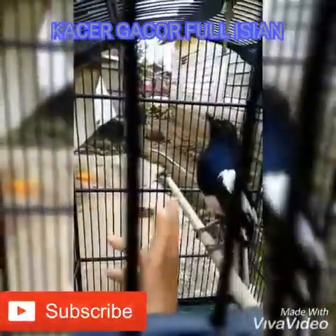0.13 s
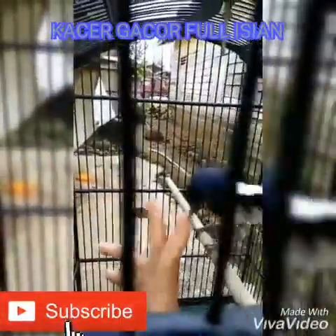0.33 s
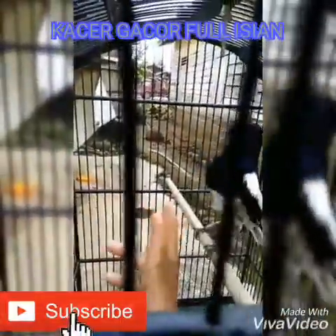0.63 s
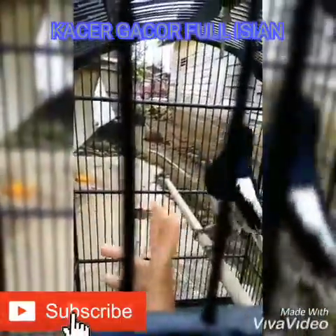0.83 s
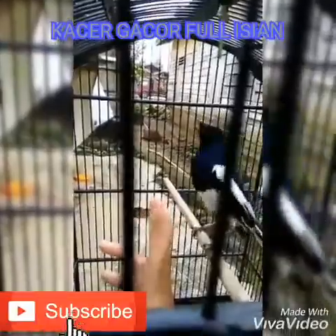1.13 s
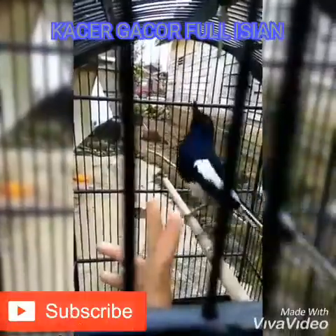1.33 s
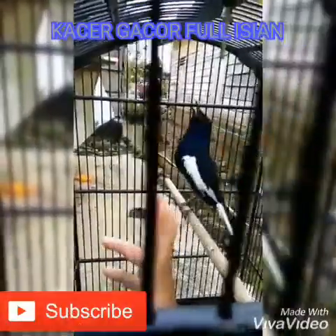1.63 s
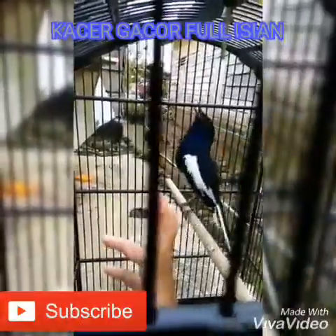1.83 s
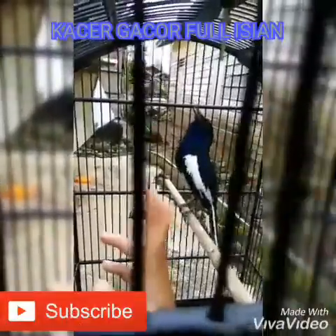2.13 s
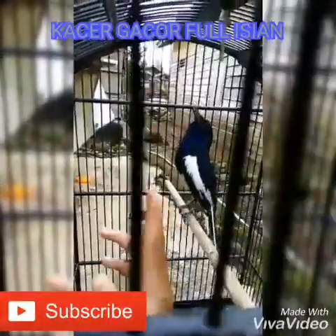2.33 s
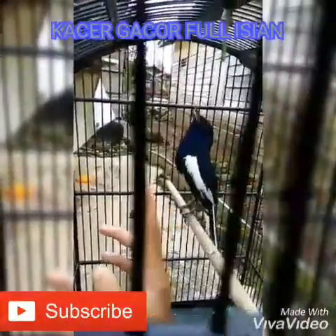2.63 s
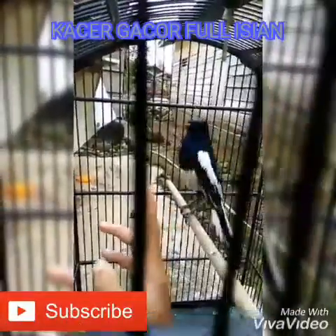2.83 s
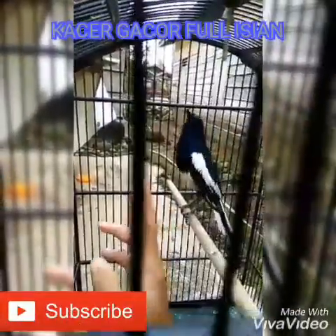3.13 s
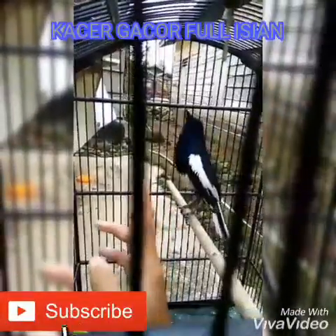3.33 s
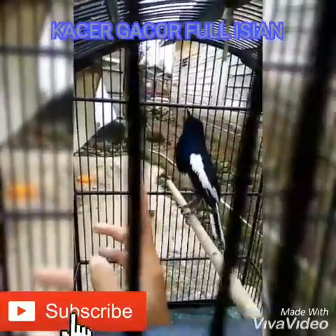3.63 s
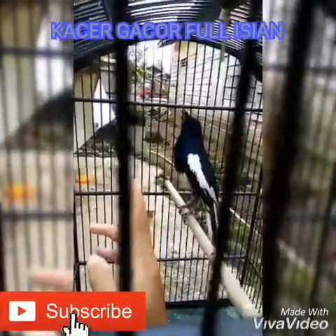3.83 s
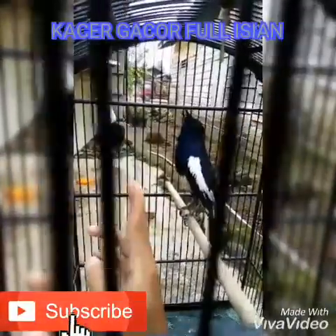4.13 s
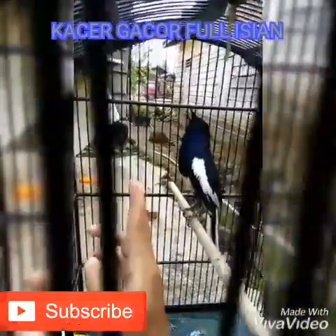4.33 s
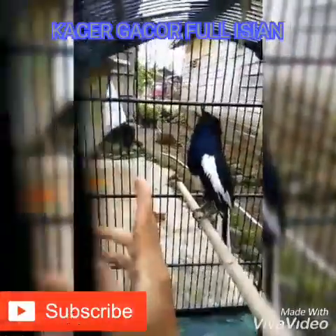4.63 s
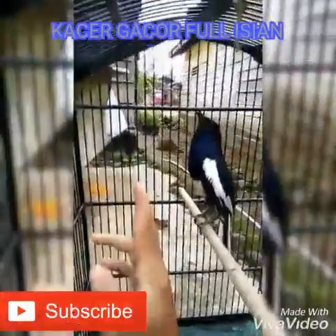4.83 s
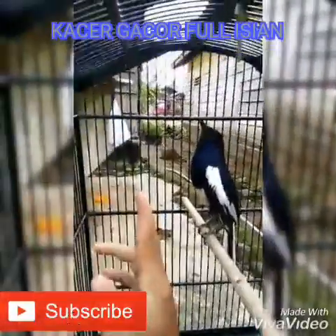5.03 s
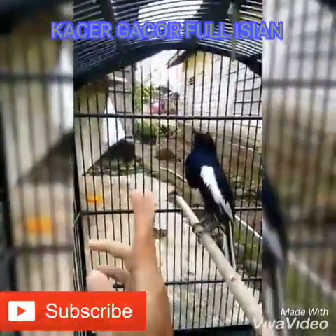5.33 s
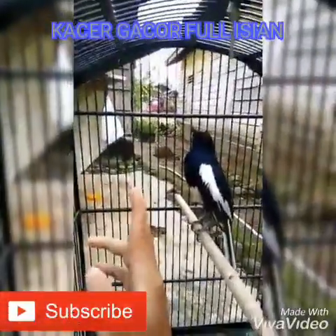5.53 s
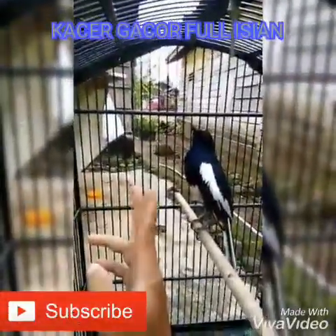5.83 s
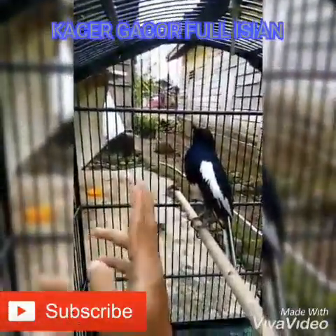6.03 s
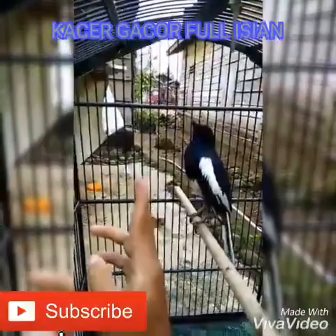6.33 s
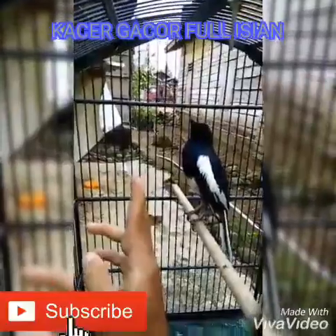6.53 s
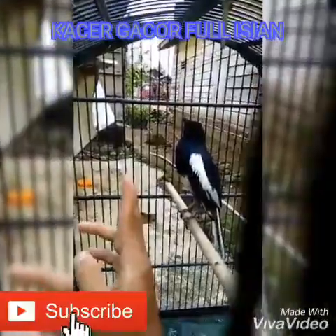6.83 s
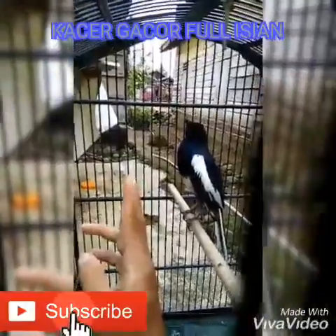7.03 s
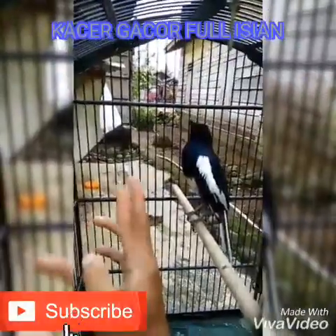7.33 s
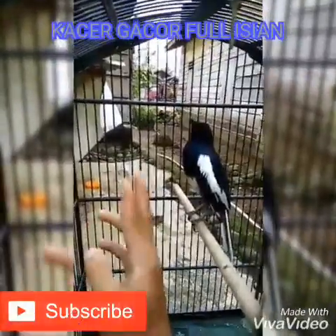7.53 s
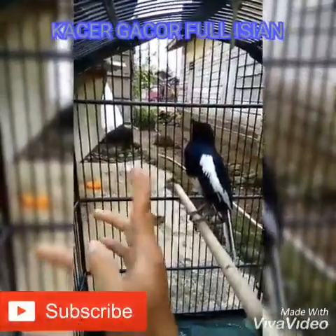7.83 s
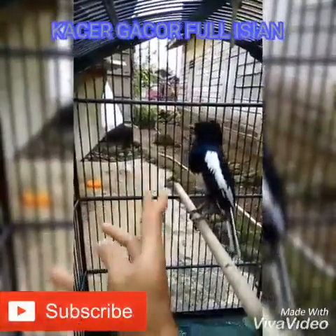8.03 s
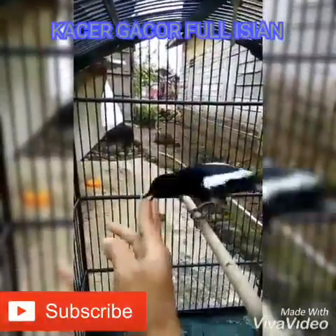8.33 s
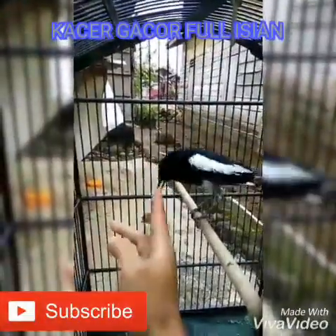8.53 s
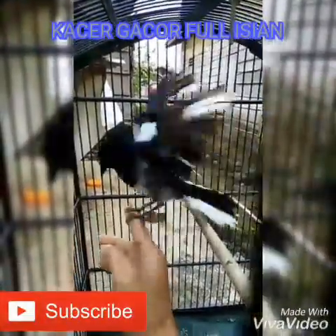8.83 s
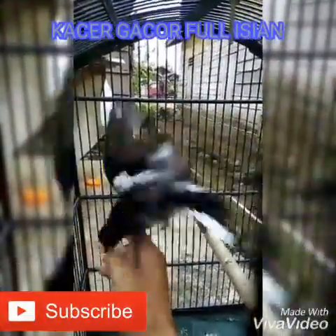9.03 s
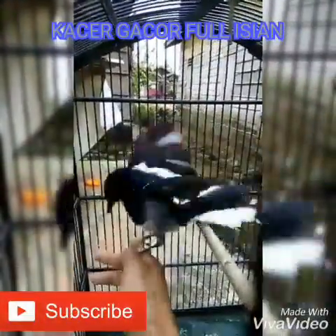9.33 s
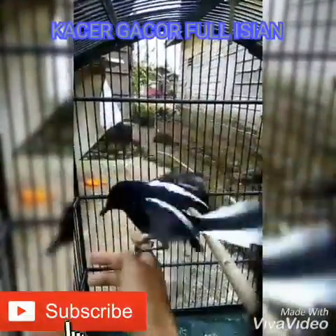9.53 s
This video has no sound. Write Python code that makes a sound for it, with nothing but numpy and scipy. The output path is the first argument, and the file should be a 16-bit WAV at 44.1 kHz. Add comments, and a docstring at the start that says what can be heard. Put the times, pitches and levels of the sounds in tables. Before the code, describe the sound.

A caged songbird bursts into loud gliding whistles and harsh rattling screeches close by, pauses over faint rumble, then sings again more softly.

```python
"""A faint far call over low hum, rumble and hiss comes first; half a second later a caged magpie-robin sings close by.
Its loud gliding whistles, trills and harsh screeches are sine waves with overtones and bands of noise.
Nearby walls add echoes; after a pause the bird starts again more softly, and its cage ticks once.
Behind it, shaped noise and slow waves make a hiss that swells late, a drone, faint noise bands and soft bumps."""
import sys
import numpy as np
from scipy import signal
from scipy.fft import rfft, irfft, next_fast_len
from scipy.io import wavfile
from scipy.ndimage import uniform_filter1d

SR = 44100
rng = np.random.default_rng(int(sys.argv[2]) if len(sys.argv) > 2 else 0)


def int16_out(signal):
    """Quantize to a 16-bit WAV file."""
    q = np.round(np.clip(np.atleast_2d(signal).T, -1, 1) * 32767)
    wavfile.write(sys.argv[1], SR, q.astype(np.int16))


N = 426447
TIME = np.arange(N) / SR
CUTOFF_HZ = 15700  # little sound remains above this


# Notes that slide one way. Columns: start_s, end_s, from_hz, to_hz, bend (no unit), then the delivery.
# bend > 0 settles on the last pitch; bend < 0 lingers near the first pitch, then flicks away.
# Delivery columns, the same in all three note tables: attack_s, release_s, whistle_db, swell_db (end against
# start), overtones_db, rasp_db, harshening_db (end against start), left_minus_right_db, left_lead_radians.
GLIDES = [(0.528, 0.562, 3700, 5750, 4.5, 0.026, .004, -18.5, 7, -39.5, -20.5, 17, -10, 1.5),
          (0.557, 0.604, 5550, 6120, -1.5, 0.0027, 0.0061, -21.5, 3, -45, -23.5, 0, -3.5, 1.55),
          (0.716, 0.792, 5730, 4390, 1.16, 0.0081, 0.0048, -20.5, -5.5, -24.5, -45, 28, -6.5, 0.8),
          (0.796, 0.917, 4445, 3265, 0.25, 0.0076, 0.0072, -15, 4, -26, -46.5, -20.5, -6, 0),
          (0.909, 1.1, 3348, 2928, 3.5, 0.0056, 0.0053, -14, -5.5, -38, -62.5, -20, -8, -1),
          (1.164, 1.221, 5405, 4726, -0.3, 0.0075, 0.0035, -8.5, 2.5, -23, -31.5, 19.5, -11.5, 2.5),
          (1.215, 1.254, 4770, 2476, 0.45, 0.0028, 0.008, -9.5, -5.5, -29, -19.5, -6, -1.5, 1.5),
          (1.329, 1.491, 5130, 5934, 1.33, 0.02, 0.019, -8.5, 7, -32.5, -31.5, 33, -3.5, 1.52),
          (1.63, 1.725, 3274, 3892, 8, 0.038, 0.0048, -6, -8, -22.5, -31, 7.5, -7.5, 4),
          (1.745, 1.791, 3835, 3270, -0.5, 0.0049, 0.0022, -12.5, -17.5, -26.5, -14, 12, -13.5, 4),
          (1.903, 1.992, 4280, 3173, 7, 0.0052, 0.0049, -11.5, -9.5, -31.5, -37, 11.5, -5.5, 4.5),
          (2.066, 2.184, 4480, 2627, 8, 0.0041, 0.013, -10, 14.5, -32, -44, 0.5, -11.5, 0.36),
          (2.219, 2.261, 1402, 2096, -3, 0.011, 0.0023, -20.5, 12.5, -48, -38.5, 8.5, 1, 3),
          (2.254, 2.336, 2028, 2473, 9, 0.006, 0.019, -7.5, -2.5, -26.5, -41.5, 3.5, -2, -1.5),
          (3.273, 3.35, 2010, 1426, 1, 0.0026, 0.006, -30.5, -1, -50, -44.5, 1.5, -0.5, -2.5),
          (4.094, 4.156, 5033, 2000, -4.5, 0.013, 0.045, -26.5, -34, -24.5, -20.5, 16.5, -4.5, -1.5),
          (4.758, 4.811, 3085, 3442, 5, 0.004, 0.0053, -9.5, 0, -18.5, -28, 7.5, -6.5, -2.5),
          (4.806, 4.86, 3364, 3670, 1.5, 0.0033, 0.0087, -7, -5.5, -18.5, -15.5, 1.5, -2.5, -4),
          (4.837, 4.886, 3006, 2790, -0.5, .008, .004, -9.5, 3.5, -20, -18, -8.5, 0, -3.5),
          (4.878, 4.985, 2832, 1911, 2.5, 0.0023, 0.0074, -8, -7.5, -22, -32.5, -6.5, -2.5, 2.0),
          (8.259, 8.29, 5550, 5320, 2.5, 0.0091, 0.0032, -24, 9, -14, -29.5, 22, -2.5, 1.5),
          (8.286, 8.32, 5500, 6010, 3.5, 0.0037, 0.0095, -19, -4, -20.5, -16, 7, -3, -0.3),
          (8.423, 8.799, 5880, 3077, 2.5, 0.037, 0.00244, -39, -19.5, -39, -46.5, 1, -3.5, -1.5),
          (8.883, 8.983, 5340, 2500, -3, 0.0042, 0.0027, -32.5, -3, -37.5, -44.5, 32.5, 2, -1.5),
          (9.05, 9.222, 5130, 6070, -0.5, 0.0058, 0.008, -33, 13.5, -39, -50, -1, -2.5, -2),
          (9.32, 9.426, 3770, 3950, 0.5, 0.0066, 0.0075, -47, 5, -32.5, -52.5, -4.5, -4, 1),
          (9.434, 9.471, 4220, 5420, 1, .01, 0.0034, -32, 25.5, -40, -37.5, 17, 1, 3.5),
          (9.604, 9.673, 4320, 3140, 1.6, 0.01, 0.0034, -24, -2.5, -23, -27.5, -5.5, -7, 5.5)]
# Notes that rise and fall.
# Columns: start_s, length_s, from_hz, top_hz, to_hz, rise_s, bend of the fall (no unit), then the delivery.
ARCHES = [(2.354, 0.28, 2150, 2225, 1419, 0.0042, 19.8, 0.0018, 0.0097, -26.5, -4.5, -46, -50, -9, -1.5, 4),
          (2.772, 0.22, 2598, 2710, 2054, 0.1, 2.33, 0.054, 0.031, -10.5, -2.5, -39, -23.5, 6, -1, -1.33),
          (3.092, 0.1, 1791, 2264, 1760, 0.054, 0.6, 0.03, 0.019, -16.5, -3, -33, -25.5, -1.5, -1, 1.9),
          (3.392, 0.12, 1910, 2453, 2006, 0.087, 0.58, 0.015, 0.012, -9, 4, -28.5, -32.5, 11, -2, 0.57),
          (4.155, 0.18, 3207, 3756, 2701, 0.037, 3.4, 0.0044, 0.0028, -9, -8, -21, -33.5, -20, -6.0, 4),
          (4.41, 0.22, 2583, 3111, 2070, 0.069, 4.73, 0.0063, 0.0031, -9, 0, -28.5, -40, 13.5, -2, 2.0)]
# Harsh, rattling notes around one pitch. Columns: start_s, length_s, pitch_hz, then the delivery.
SCREECHES = [(1.760, 0.09, 5900, 0.019, 0.016, -15, -15, -22.5, -8.5, -3, -17.5, 0.66),
             (3.606, 0.0073, 4300, .002, 0.0028, -23.5, 0.5, -32.5, -12, -1.5, -5, 2),
             (3.615, 0.14, 4212, 0.003, 0.028, -17.5, 3, -35.5, -7, -6, -8, 4.5),
             (3.758, 0.041, 4440, .002, 0.0033, -16.5, -30, -25.5, -10.5, -17.5, 4, 2.3),
             (3.799, 0.028, 4400, 0.0066, 0.0062, -16.5, -9, -27.5, -6.5, -5, 2, 1.07),
             (3.831, 0.016, 4394, 0.0016, 0.0068, -25.5, -3, -24.5, -5, -2.5, -15, 1.04),
             (9.463, 0.075, 6300, 0.007, 0.012, -20, -14, -33, -25.5, -16, 0, 1.23)]


def bird():
    """Glides, arches and screeches, with broad air noise under the raspy ones and hoarse extra tones."""
    glides = [(start, end - start, *rest) for start, end, *rest in GLIDES]
    voices, breaths = zip(
        sing(glides, glide, breath_db=-8.5, rasp_width_hz=480, half_db=-7.5),
        sing(ARCHES, arch, breath_db=-15.5, rasp_width_hz=280, half_db=-9.0),
        sing(SCREECHES, screech, breath_db=-12.0, rasp_width_hz=360, half_db=-9.5, rattles=True))
    air_noise = sum(breaths) * diffuse_noise(RASP_HIGH_NOTES)
    return sum(voices) + air_noise + extra_tones()


# Moments where the whistle briefly swells or dips. Columns: time_s, half_width_s, change_db.
ACCENTS = [(0.758, 0.019, -16.5), (2.145, 0.019, 3), (2.365, 0.013, 15), (4.336, 0.008, 13),
           (4.564, 0.023, 6), (4.912, 0.023, 2.5), (8.536, 0.022, 22.5), (8.757, 0.058, 25),
           (9.077, 0.0188, 16.5)]


def sing(notes, contour, breath_db, rasp_width_hz, half_db, rattles=False):
    """Sing notes of one kind, and give the strength of the air noise under them."""
    voice, breath = np.zeros((2, N)), np.zeros(N)
    for start, length, *shape, attack_s, release_s, whistle_db, swell_db, overtone_db, rasp_db, \
            harshen_db, pan_db, lead in notes:
        span, age, gate = during(start, length, attack_s, release_s)
        t = TIME[span]
        whistle_db, overtone_db, rasp_db = loudness(
            age / length, whistle_db, swell_db, overtone_db, rasp_db, harshen_db)
        for accent_s, width_s, change_db in ACCENTS:
            distance = (t - accent_s) / width_s
            whistle_db = whistle_db + change_db * np.exp(-np.minimum(distance ** 2, 20))
        pitch = contour(age, length, *shape)
        sound, air = syrinx(t, pitch, whistle_db, overtone_db, rasp_db, pan_db, lead, rasp_width_hz, half_db)
        if rattles:
            gate = gate * rattle(age)
        voice[:, span] += gate * sound
        breath[span] += gate * air
    return voice, from_db(breath_db) * breath


# How much stronger the left side gets the overtones and rasp. Columns: frequency_hz, left_minus_right_db.
TREBLE_PAN = [(4400, -2), (8100, 0), (13000, 2.5)]


def syrinx(t, pitch, whistle_db, overtone_db, rasp_db, pan_db, lead, rasp_width_hz, half_db,
           jitter_hz=220, jitter_rate_hz=700, shimmer=0.27, blur=2.3, blur_hz=55, grain_db=3.5, grain_hz=55):
    """One note from the voice organ: whistle, overtones and rasp; then the strength of its breath noise."""
    pitch = trilled(t, pitch)
    # driven hard, the membranes flap irregularly: pitch and strength waver more as rasp nears the whistle
    chaos = np.minimum(from_db(rasp_db - whistle_db), 1)
    wavering_hz = pitch + jitter_hz * chaos * flutter(jitter_rate_hz, len(t))
    phase = 2 * np.pi * np.cumsum(wavering_hz) / SR
    strength = 1 + shimmer * chaos * flutter(230, len(t))
    strength = strength / np.sqrt(1 + (shimmer * chaos) ** 2)  # keeps the average power

    whistle = np.array([from_db(pan_db) * np.sin(phase + lead), np.sin(phase)])
    whistle *= 2 * from_db(whistle_db) / np.sqrt(1 + from_db(pan_db) ** 2)

    # the stronger and higher the overtones, the more they blur
    blur = blur * from_db(overtone_db - whistle_db) ** 0.36
    whole = np.arange(2, 9)[:, None]
    overtone_level_db = partial_colour(OVERTONES_LOW_NOTES, OVERTONES_HIGH_NOTES, whole, pitch)
    overtone_weights = shares(overtone_level_db, whole * pitch)

    # the rasp also fills the half orders, as the vibration doubles its period
    width_hz = rasp_width_hz * (.5 + chaos.mean())
    halves = np.arange(1, 17)[:, None] / 2
    grain = grain_db * chaos * np.array([flutter(grain_hz, len(t)) for partial in halves])
    rasp_level_db = partial_colour(RASP_LOW_NOTES, RASP_HIGH_NOTES, halves, pitch)
    rasp_level_db = rasp_level_db + grain + half_db * (halves % 1 > 0)
    rasp_weights = shares(rasp_level_db, halves * pitch)

    ears = []
    for shift, side in ((lead, .5), (0, -.5)):  # left, right
        overtones, rasp = 0, 0
        for k, weight in zip(whole, overtone_weights):
            aim = from_db(side * at_hz(TREBLE_PAN, k * pitch.mean()))
            clear = np.sqrt(2) * np.sin(k * (phase + shift))
            blurred = blur * narrow_noise(k * phase, k * blur_hz)
            overtones = overtones + aim * weight * (clear + blurred)
        for k, weight in zip(halves, rasp_weights):
            aim = from_db(side * at_hz(TREBLE_PAN, k * pitch.mean()))
            rasp = rasp + aim * weight * narrow_noise(k * phase, width_hz)
        ears.append(from_db(overtone_db) * overtones / np.hypot(1, blur) + from_db(rasp_db) * rasp)
    return strength * (whistle + ears), strength * from_db(rasp_db) * np.sqrt(chaos)


# Trills and buzzes inside the notes. Columns: start_s, end_s, swings_per_s, swing_hz (each way).
TRILLS = [(0.546, 0.605, 26, 200), (3.617, 3.746, 59.5, 423), (9.465, 9.537, 135, 744),
          (1.699, 1.72, 41, 297), (4.205, 4.239, 81, 320), (1.399, 1.497, 44, 400),
          (1.93, 1.988, 42.5, 217.2), (2.333, 2.626, 118, 200), (2.78, 2.877, 108, 70),
          (3.094, 3.19, 200, 127), (4.16, 4.23, 32.8, 133.8), (9.147, 9.216, 55, 478.5)]
# no note is quite steady, no trill quite even (shares of pitch and of trill rate)
WAVER_SHARE, WAVER_PER_S, TRILL_UNEVENNESS = .005, 70, .17


def trilled(t, pitch):
    """The pitch with its slight unsteadiness and its uneven trills."""
    pitch = pitch * (1 + WAVER_SHARE * flutter(WAVER_PER_S, len(t)))
    for start, end, per_s, swing_hz in TRILLS:
        inside = (t > start) & (t < end)
        if inside.any():
            uneven_rate = per_s * (1 + TRILL_UNEVENNESS * flutter(per_s, len(t)))
            cycles = np.cumsum(inside * uneven_rate) / SR
            pitch = pitch + swing_hz * inside * np.sin(2 * np.pi * cycles)
    return pitch


# Colour of the rasp in high notes and in low notes. Columns: frequency_hz, relative level_db (per Hz).
RASP_HIGH_NOTES = [(1200, -15), (2200, -9.5), (4300, 2.5), (6000, 5.5), (7800, 0), (8800, -7.5),
                   (9800, 6.5), (11000, 5), (12200, -4.5), (13300, -13.5), (15500, -17)]
RASP_LOW_NOTES = [(1200, -8), (2400, 0), (3600, 10.5), (5000, -2), (7000, -3), (9000, -11), (12500, 1),
                  (15000, -0.5)]
# Colour of the overtones in high notes and in low notes. Columns: frequency_hz, relative level_db.
OVERTONES_HIGH_NOTES = [(5900, 2), (7000, -2.5), (8800, -4.5), (10800, 5.5), (12500, -15.5), (15500, -14.5)]
OVERTONES_LOW_NOTES = [(3000, -1), (4700, -12), (6500, -2.5), (8800, -10.5), (12000, -2), (14500, 3)]
# the low colour starts to fade into the high one at this mean pitch, and is gone this much higher
COLOUR_TURNS_HZ, COLOUR_TURN_SPAN_HZ = 2767, 260


def partial_colour(low_notes, high_notes, orders, pitch):
    """Level of each partial in dB: one colour fades into the other as the note's mean pitch rises."""
    high_share = np.clip((pitch.mean() - COLOUR_TURNS_HZ) / COLOUR_TURN_SPAN_HZ, 0, 1)
    hz = orders * pitch
    colour_db = (1 - high_share) * at_hz(low_notes, hz) + high_share * at_hz(high_notes, hz)
    return colour_db + partial_drift(len(orders), len(pitch))


# how far and how fast the balance of the partials drifts
PARTIAL_DRIFT_DB, PARTIAL_DRIFT_PER_S = 4.5, 16


def partial_drift(count, size):
    """Each partial swells and fades at random (dB)."""
    return PARTIAL_DRIFT_DB * np.array([flutter(PARTIAL_DRIFT_PER_S, size) for partial in range(count)])


def shares(level_db, hz):
    """Weights of the audible partials, with a total power of one."""
    weight = from_db(level_db) / (1 + (hz / CUTOFF_HZ) ** 20)
    return weight / np.sqrt(np.sum(weight ** 2, axis=0))


def bent(start, end, bend, u):
    """Exponential slide from start to end as u goes from 0 to 1."""
    return start + (end - start) * np.expm1(-bend * u) / np.expm1(-bend)


def glide(age, length, from_hz, to_hz, bend):
    """Pitch of a note that slides one way."""
    return bent(from_hz, to_hz, bend, age / length)


def arch(age, length, from_hz, top_hz, to_hz, rise_s, bend):
    """Pitch of a note that eases up to its top, rolls over and falls."""
    rising = top_hz + (from_hz - top_hz) * (1 - age / rise_s) ** 2
    falling = bent(top_hz, to_hz, bend, ((age - rise_s) / (length - rise_s)) ** 2)
    return np.where(age < rise_s, rising, falling)


SCREECH_SAG_HZ_PER_S = 3300


def screech(age, length, hz):
    """Pitch of a screech: it sags steadily through the given pitch at mid-note."""
    return hz - SCREECH_SAG_HZ_PER_S * (age - length / 2)


# average rate of the rattle, and its swing up and down
RATTLE_PER_S, RATTLE_DB = 115, 2.4


def rattle(age, unevenness=0.56):
    """Gain of the uneven pulses that roughen a screech."""
    cycles = np.cumsum(RATTLE_PER_S * (1 + unevenness * flutter(60, len(age)))) / SR
    return from_db(RATTLE_DB * np.sin(2 * np.pi * cycles))


# breath pressure peaks at mid-note: how far each part has dropped at the note's ends
WHISTLE_BELLY_DB, HARSH_BELLY_DB = 2.5, 3.5


def loudness(u, whistle_db, swell_db, overtone_db, rasp_db, harshen_db):
    """Levels of whistle, overtones and rasp as u goes from 0 to 1: a steady tilt plus a bulge mid-note."""
    tilt, ends = u - .5, (2 * u - 1) ** 2
    whistle_db = whistle_db + swell_db * tilt - WHISTLE_BELLY_DB * ends
    harsh_db = harshen_db * tilt - HARSH_BELLY_DB * ends
    return whistle_db, overtone_db + harsh_db, rasp_db + harsh_db


# Hoarse extra tones above or below the notes. Columns: start_s, length_s, from_hz, to_hz, level_db.
EXTRA_TONES = [(0.52, 0.04, 4650, 4030, -20.5), (1.786, 0.044, 3350, 3100, -23.5),
               (3.612, 0.12, 2250, 2170, -24), (3.62, 0.092, 2020, 2290, -24.5),
               (4.112, 0.044, 3040, 2030, -23), (3.03, 0.067, 1520, 1340, -29),
               (3, 0.079, 1450, 1020, -35.5), (3.275, 0.066, 1040, 880, -38),
               (1.5, .035, 4950, 4850, -30.5), (4.28, .06, 6200, 6500, -18),
               (4.8, 0.082, 6050, 5550, -22.5), (4.81, 0.16, 4650, 4150, -34.5),
               (4.74, 0.047, 2500, 2140, -24.5), (9.471, 0.06, 3350, 3350, -33)]


def extra_tones(half_width_hz=150):
    """Hoarse extra tones, above or below the notes, made of narrow noise."""
    out = np.zeros((2, N))
    for start, length, from_hz, to_hz, level_db in EXTRA_TONES:
        span, age, gate = during(start, length)
        phase = 2 * np.pi * np.cumsum(from_hz + (to_hz - from_hz) * age / length) / SR
        out[:, span] += from_db(level_db) * gate * [narrow_noise(phase, half_width_hz) for ear in range(2)]
    return out


# Bright colour of the cage's tick. Columns: frequency_hz, relative level_db (per Hz).
TICK_COLOUR = [(300, -42), (1300, -2.0), (5000, 2.0), (15000, 8)]


def cage_tick(at_s=9.243, level_db=-22.5, t60=0.076):
    """Claws hit the cage as the bird hops: bright noise that dies by 60 dB in t60 seconds."""
    age = TIME - at_s
    fade = (age > 0) * from_db(level_db - 60 * np.abs(age) / t60)
    return fade * diffuse_noise(TICK_COLOUR)


# Early echoes from cage floor and wall. Columns: delay_s, left_db, right_db.
ECHOES = [(.0051, -22.5, -8), (.0094, -8, -16)]


def walls(x, t60=0.26, wet_db=-15.0, treble_db=0.0):
    """Two near echoes, then a short tail of noise that fades by 60 dB in t60 seconds."""
    early = sum(from_db([[left_db], [right_db]]) * delayed(x, s) for s, left_db, right_db in ECHOES)
    t = TIME[:SR // 2]
    tail = rng.standard_normal((2, len(t))) * from_db(-60 * t / t60) * (1 - np.exp(-t / 0.0014))
    tail = tail / np.sqrt(np.sum(tail ** 2, axis=1, keepdims=True))
    # the tail gets a little extra of the very highest treble
    treble = x - low_pass(x, 15000, order=1)
    into_tail = x + from_db(treble_db) * treble
    return x + early + from_db(wet_db) * signal.fftconvolve(into_tail, tail, axes=1)[:, :N]


# Faint calls farther off. Columns: start_s, end_s, from_hz, to_hz, level_db.
FAR_CALLS = [(0, 0.377, 2290, 2265, -51.5), (6.42, 6.952, 519, 849, -58), (6.701, 7.3, 1280, 1276, -58),
             (7.45, 7.95, 2334, 2430, -56), (4.67, 4.764, 4950, 5700, -49.5),
             (4.98, 5.112, 5500, 6800, -45), (8.79, 8.85, 5450, 5900, -37)]


def far_calls(width_share=0.017):
    """Distant gliding calls, smeared into narrow noise and softened on their way."""
    out = np.zeros((2, N))
    for start, end, from_hz, to_hz, level_db in FAR_CALLS:
        length = end - start
        span, age, gate = during(start, length, length / 10, length / 3)
        phase = 2 * np.pi * np.cumsum(np.linspace(from_hz, to_hz, len(age))) / SR
        ears = [narrow_noise(phase, width_share * from_hz) for ear in range(2)]
        out[:, span] += from_db(level_db) * gate * ears
    return out


# Soft bumps on the microphone body. Columns: time_s, level_db (about the peak).
BUMPS = [(0.607, -36.5), (1.517, -35), (2.47, -33.5), (2.631, -37.5), (4.733, -30), (4.995, -33),
         (5.347, -33), (5.456, -33), (5.561, -32.5), (5.927, -31.5), (6.057, -32), (7.429, -26),
         (7.605, -25), (7.794, -27.5), (8.041, -33)]


def bumps(body_hz=60, rise_s=0.02, level_db=0.0):
    """Each soft push is a low wave with some rumble that swells and dies within a few slow cycles."""
    out = np.zeros(N)
    t = TIME[:SR // 3]
    swell = (t / rise_s * np.exp(1 - t / rise_s)) ** 2
    for start, bump_db in BUMPS:
        at = int(start * SR)
        push = np.sin(2 * np.pi * body_hz * t) + 0.33 * flutter(73.02, len(t))
        out[at:at + len(t)] += from_db(bump_db + level_db) * swell * push
    return out


# Faint bands of noise, low to high. Columns: start_s, length_s, centre_hz, half_width_hz, level_db.
NOISE_BANDS = [(5.67, 0.3, 5260, 1907, -51), (7.0, 0.41, 2200, 262, -54), (7.21, 0.38, 4000, 2600, -51.5),
               (7.829, .38, 310, 34.8, -45), (8.027, 0.6, 9070, 750, -37.5)]


def noise_bands():
    """Faint bands of noise, low to high, that swell and fade."""
    out = np.zeros((2, N))
    for start, length, hz, half_width_hz, level_db in NOISE_BANDS:
        span, age, gate = during(start, length, length / 4, length / 2)
        phase = 2 * np.pi * hz * age
        out[:, span] += from_db(level_db) * gate * [narrow_noise(phase, half_width_hz) for ear in range(2)]
    return out


# Level of a low drone that comes up late. Columns: time_s, level_db.
DRONE_LEVEL = [(4.3, -66), (5.2, -51.5), (6.15, -40), (6.35, -58), (6.95, -42.5), (7.3, -51), (8.0, -47),
               (9.67, -49.5)]
# Colour of the drone. Columns: frequency_hz, relative level_db (per Hz).
DRONE_COLOUR = [(90, -28.5), (140, 5.5), (185, 2.5), (230, -11), (310, -16), (450, -44)]


def drone(waver_db=3.0):
    """An uneven low drone made of deep noise."""
    level_db, = in_time(DRONE_LEVEL)
    return from_db(level_db + waver_db * flutter(9, N)) * diffuse_noise(DRONE_COLOUR)


# Changing loudness of rumble and hiss. Columns: time_s, rumble_db, hiss_db.
RUMBLE_AND_HISS = [(0, -63.5, -68), (0.7, -59.5, -62.5), (4.4, -58, -63.5), (5.2, -56, -68),
                   (6.12, -59.5, -65), (6.35, -51, -61.5), (6.95, -53.5, -51), (7.5, -51.5, -50.5),
                   (8.1, -47, -48), (9.67, -54, -55)]
# Low hum. Columns: time_s, pitch_hz, level_db.
HUM = [(0, 60.56, -61), (4.0, 59.55, -61), (5.3, 60.32, -52.5), (6.7, 60.6, -84), (7.3, 60.58, -43.5),
       (8.2, 69.3, -50.5), (9.67, 70.64, -56)]
# Colours of the rumble, the hiss and the steady outdoor air. Columns: frequency_hz, relative level_db (per Hz).
RUMBLE = [(22, -17), (50, 2), (100, 5), (160, -0.5), (200, -7), (300, -5), (500, -25), (1500, -38)]
HISS = [(300, 4), (700, -1), (1300, 4), (2300, 8), (4000, -4), (6800, 2.5), (9300, 8.5), (11500, 5),
        (14000, 10), (16000, 1)]
AIR = [(250, -3), (650, 4.5), (2300, -2), (4000, -17), (15000, -25)]


def background(octave_db=-10.5, waver_db=6.0, air_db=-68):
    """A wavering hum with its octave, over an uneven rumble, a hiss that swells late and steady air."""
    rumble_db, hiss_db = in_time(RUMBLE_AND_HISS)
    hum_hz, hum_db = in_time(HUM)
    phase = 2 * np.pi * np.cumsum(hum_hz + 1.0 * flutter(9.3, N)) / SR
    hum_tone = np.sin(phase) + from_db(octave_db) * np.sin(2 * phase)
    hum = np.sqrt(2) * from_db(hum_db + waver_db * flutter(7.9, N)) * hum_tone
    rumble = from_db(rumble_db + 1.1 * flutter(2.3, N)) * diffuse_noise(RUMBLE)
    hiss = from_db(hiss_db) * diffuse_noise(HISS)
    air = from_db(air_db) * diffuse_noise(AIR)
    return hum + rumble + hiss + air


# How alike the two channels are in sound from all around. Columns: frequency_hz, coherence (1 = identical).
LIKENESS = [(130, 1), (290, 0.7), (640, 0.96), (1400, 0.035)]


def diffuse_noise(spectrum):
    """Coloured stereo noise of unit power, alike in the bass and nearly unrelated in the treble."""
    size = next_fast_len(N)
    hz = np.linspace(0, SR / 2, size // 2 + 1)
    mid, side = rfft(rng.standard_normal((2, size))) * from_db(at_hz(spectrum, hz))
    alike = np.clip(at_hz(LIKENESS, hz), -1, 1)
    stereo = np.sqrt(1 + alike) * mid + np.sqrt(1 - alike) * side * [[1], [-1]]
    return rms_one(irfft(stereo)[:, :N])


def narrow_noise(phase, half_width_hz):
    """Noise of power one half gathered closely round a moving partial."""
    size = phase.shape[-1]
    sine_part = np.sin(phase) * flutter(half_width_hz, size, order=4)
    cosine_part = np.cos(phase) * flutter(half_width_hz, size, order=4)
    return (sine_part + cosine_part) / np.sqrt(2)


def flutter(hz, size, order=2):
    """Random wobble up to about the given rate, spread 1."""
    length = next_fast_len(size)
    f = np.arange(length // 2 + 1) * SR / length
    slowed = rfft(rng.standard_normal(length)) / np.hypot(1, (f / hz) ** order)
    return rms_one(irfft(slowed, length)[:size])


def during(start, length, attack_s=0.0045, release_s=0.0067):
    """The samples of a note, their age, and its attack, hold and release."""
    span = slice(max(int(start * SR) + 1, 0), int((start + length) * SR))
    age = TIME[span] - start
    gate = np.clip(age / attack_s, 0, 1) * np.clip((length - age) / release_s, 0, 1)
    return span, age, gate


def delayed(x, seconds):
    """The same stereo sound, later."""
    return np.array([np.interp(TIME - seconds, TIME, side, left=0) for side in x])


def low_pass(x, hz, order=2):
    """Keep what lies below hz, without looking ahead."""
    return signal.sosfilt(signal.butter(order, min(hz, SR / 2 - 1), fs=SR, output="sos"), x)


def from_db(db):
    """Decibels to gain."""
    return 10 ** (np.asarray(db) / 20)


def rms_one(x):
    """Scale to unit power."""
    return x / np.sqrt(np.mean(x ** 2) + 1e-20)


def in_time(rows, t=TIME):
    """Each column of a curve, joined by straight lines."""
    s, *columns = np.transpose(rows)
    return [np.interp(t, s, c) for c in columns]


def at_hz(points, hz):
    """Read a spectrum on a log-frequency axis."""
    f, value = np.transpose(points)
    return np.interp(np.log(np.maximum(hz, 1)), np.log(f), value)


def scene():
    """The bird, its cage and the far calls between the walls, over the background sounds."""
    return walls(bird() + cage_tick() + far_calls()) + background() + drone() + bumps() + noise_bands()


def record(dry, ceiling_db=2.5, release_db_per_s=260, lopsided=0.06, crackle_hz=300):
    """Microphones driven hard add crackle; a fast limiter and overload hold peaks, and the top is cut."""
    # squaring mixes loud partials into new tones; those above crackle_hz are kept
    keep_crackle = signal.butter(3, crackle_hz, "high", fs=SR, output="sos")
    dry = dry + lopsided * signal.sosfilt(keep_crackle, dry ** 2)
    over_db = np.maximum(20 * np.log10(np.abs(dry).max(axis=0) + 1e-9) - ceiling_db, 0)
    held_db = np.maximum.accumulate(over_db + release_db_per_s * TIME) - release_db_per_s * TIME
    limited = dry * from_db(-uniform_filter1d(held_db, size=64))
    top_cut = signal.ellip(10, .1, 80, CUTOFF_HZ, fs=SR, output="sos")
    return signal.sosfilt(top_cut, np.clip(limited, -1, 1))


dry = scene()
out = record(dry)
int16_out(out)
```